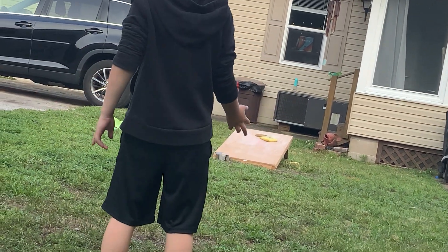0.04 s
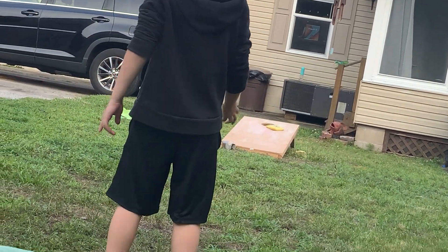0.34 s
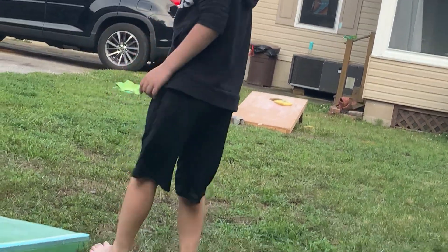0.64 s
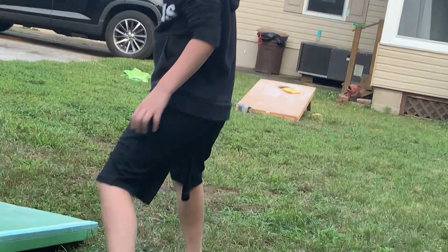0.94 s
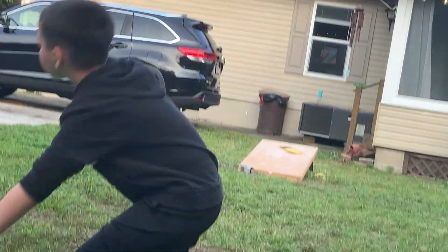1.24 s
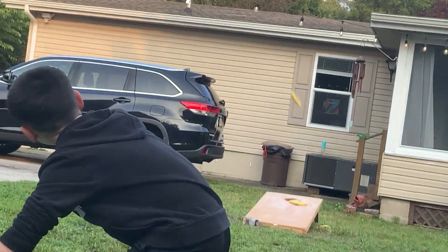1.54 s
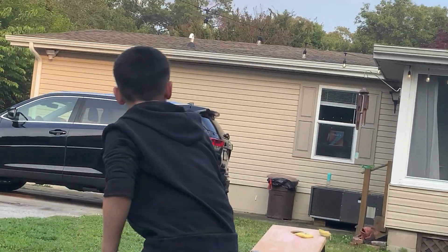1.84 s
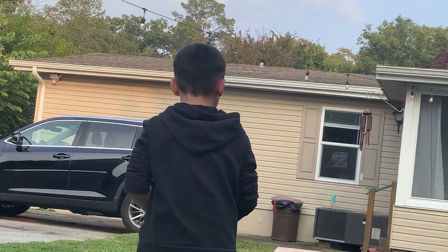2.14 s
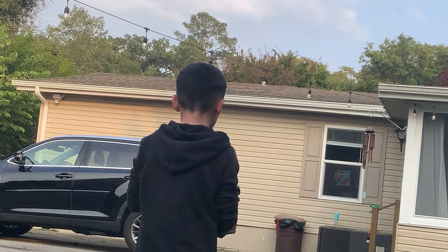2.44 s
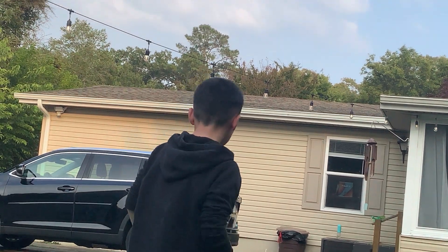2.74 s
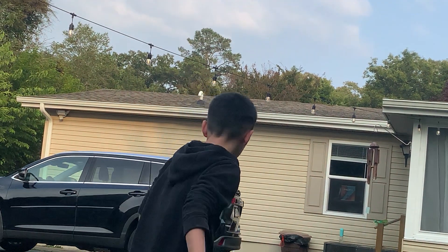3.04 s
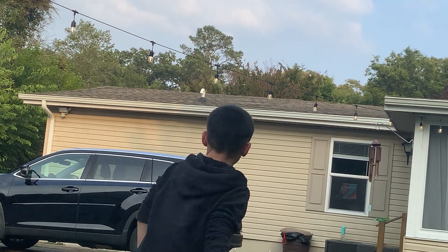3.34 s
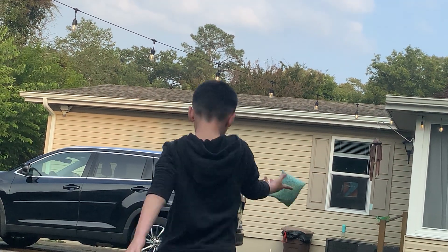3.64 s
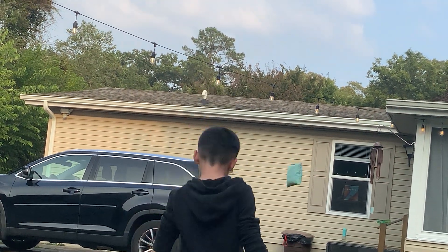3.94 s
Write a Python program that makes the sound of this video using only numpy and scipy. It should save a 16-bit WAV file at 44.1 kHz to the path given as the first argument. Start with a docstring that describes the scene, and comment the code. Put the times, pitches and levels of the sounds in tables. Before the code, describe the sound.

In an open yard, a light knock comes first, then a bean bag thumps onto a nearby wooden board, its filling crunching briefly. Faint footsteps and clothing rustle continue over a low rumble and distant insects.

```python
"""A bean bag lands on a hollow wooden board close to the microphone: the cloth slaps, the board booms
in its modes, the filling crunches and slides. A lighter knock comes earlier, and clothes swish and
grass rustles as a player moves on the lawn. The place is an open yard, with a low rumble, soft air and
faint insects farther off; walls and trees scatter the hits back. Two closely spaced microphone ports
pick it all up, each with its own phase and level."""
import sys
import numpy as np
from scipy import signal
from scipy.fft import rfft, irfft
from scipy.io import wavfile

SR = 44100
rng = np.random.default_rng(int(sys.argv[2]) if len(sys.argv) > 2 else 0)


def unload_audio(sound):
    """Save the sound as a 16-bit wav file, at the path given as the first command line argument."""
    columns = np.transpose(np.atleast_2d(sound))
    # keep every value between -1 and 1, then stretch to whole-number steps
    steps = np.round(np.clip(columns, -1, 1) * 32767)
    wavfile.write(sys.argv[1], SR, steps.astype(np.int16))


N = 176400

# The yard's low rumble and open air. Each row: frequency in Hz, level in dB.
RUMBLE_SPECTRUM = [(20, -17), (35, -26), (45, -18), (54, -6), (66, -3), (85, 0), (115, -7), (200, -19.5),
                   (320, -23), (550, -40), (1500, -58)]
AIR_SPECTRUM = [(150, 3), (400, -3.5), (600, -3), (1050, 3.5), (1500, -4.5), (2000, -8.5), (2500, -15),
                (3100, -11.5), (4300, -11.5), (5600, -17.5), (7200, -22.5), (9000, -20), (12500, -16)]
# How the rumble rises and falls. Each row: time in seconds, level in dB.
RUMBLE_LEVELS = [(0, -46), (.95, -44.5), (1.6, -46), (2.2, -46), (3.0, -47), (4, -48)]
# Single insects, faint at the microphone. Each row: pitch in Hz, level in dB.
INSECT_TRILLS = [(4398, -73), (4560, -79), (4703, -71.5), (5035, -79), (5437, -77.5)]
# The far insect chorus. Each row: band centre in Hz, half width in Hz, level in dB.
CHORUS_BANDS = [(4780, 340, -74.5), (8800, 660, -73)]

# The fine high swish of clothes. Each row: frequency in Hz, level in dB.
CLOTH_SWISH_SPECTRUM = [(3000, -31), (6000, -10.5), (7500, -8), (9000, 3.5), (10500, -8.5), (12300, 1),
                        (13400, -2)]
# The swish swells and fades as the player moves. Each row: time in seconds, level in dB.
CLOTH_SWISH_LEVELS = [(0, -62), (.35, -61.5), (.55, -68), (.7, -59), (.98, -65), (1.35, -59), (1.72, -67),
                      (2.1, -58.5), (2.4, -68.5), (2.62, -68), (2.8, -57), (3.0, -71), (3.2, -68),
                      (3.43, -55.5), (3.6, -60), (3.85, -70)]
# Footfalls on the lawn, and rustles of clothes and grass.
# Each row: peak time in seconds, level in dB, rise and fall in seconds.
FOOTFALLS = [(.91, -54.5, 0.037, 0.044), (1.39, -53.5, 0.048, 0.1), (2.24, -51.5, 0.048, 0.081),
             (3.34, -55, 0.051, 0.048)]
RUSTLE_SWELLS = [(1.36, -53.5, 0.075, 0.08), (1.58, -58.5, 0.074, 0.037), (2.11, -53.5, .05, 0.055),
                 (2.805, -59, .015, .02), (3.275, -57.5, .008, 0.027), (3.45, -52.5, 0.04, .045),
                 (3.98, -49.5, .018, 0.034)]
# The tone of a footfall, a rustle and a shoe scuff. Each row: frequency in Hz, level in dB.
STEP_SPECTRUM = [(50, 0), (130, 1), (300, 0), (700, -4), (1500, -12), (4000, -48)]
RUSTLE_SPECTRUM = [(200, 3), (700, 8), (1800, 7), (3000, 0), (6000, -1.5), (9000, -3), (11000, -0.5),
                   (15000, -25)]
SCUFF_SPECTRUM = [(350, -8), (650, 11), (1800, 8.5), (3200, 0.5), (9500, -1.5), (14000, -10)]
# Small snaps in the grass. Each row: peak time in seconds, level in dB, centre in Hz, fall in seconds.
GRASS_SNAPS = [(1.033, -52, 5900, 0.0078), (1.316, -50, 6300, .003), (1.383, -43, 1900, .004),
               (2.307, -52.5, 6500, .003), (2.52, -55.5, 7500, .004)]

# Modes of the lighter knock and of the hollow board.
# Each row: frequency in Hz, level in dB, seconds to fall by 60 dB.
KNOCK_MODES = [(88, -38, 0.16), (176, -38, 0.13), (295, -38, 0.085), (532, -41.5, 0.076),
               (670, -38.5, 0.065), (890, -34.5, 0.064), (1110, -37.5, 0.041), (1880, -44, 0.038)]
BOARD_MODES = [(57, -26.5, 0.21), (84.5, -21.5, 0.11), (145, -24.5, 0.12), (171.5, -26.5, .13),
               (235.4, -31.5, 0.17), (279.1, -30.5, 0.24), (318, -26.5, 0.15), (413, -26.5, 0.1),
               (465, -21, 0.054), (511, -28, 0.12), (695, -29, 0.095), (884, -32.5, 0.1), (967, -31, .05),
               (1912, -36, 0.087)]
# Dull thumps: the bag's full weight arrives, then the board rocks back.
# Each row: start in seconds, gain in dB, low-pass cutoff in Hz.
BOARD_THUMPS = [(1.8445, -2, 135), (1.8795, -8, 240)]
# The cloth's slap and the filling's crunch from close by. Each row: frequency in Hz, level in dB.
SLAP_SPECTRUM = [(300, -14), (1200, -6), (2500, 4.5), (4500, 3.5), (6500, 5.5), (8500, -1), (11000, -13),
                 (13000, -7)]
FILLING_SPECTRUM = [(200, 1), (500, 4.5), (1000, 1), (1400, 0.5), (2100, 4.5), (3300, -0.5), (5000, -4.5),
                    (7000, -7), (9000, -12), (11000, -19), (13000, -22)]
# The filling surges as the bag lands, flattens and slides.
# Each row: peak time in seconds, level in dB, rise and fall in seconds.
FILLING_SURGES = [(1.8369, -25.5, 0.0017, 0.0043), (1.859, -36, 0.011, 0.024), (1.935, -47, 0.018, 0.054)]

# What walls and trees send back to the microphone. Each row: frequency in Hz, level in dB.
SCATTER_SPECTRUM = [(60, -6), (250, -7), (1500, 2), (5000, -5), (12000, -0.5)]
# Phase between the ports. Each row: frequency in Hz, lead of the left port in radians.
LEFT_PORT_LEAD = [(30, 0), (340, .1), (690, -.7), (1250, .3), (1650, 1.6), (2050, 1.5), (2510, 3.14),
                  (3000, 5.0), (3500, 6.1), (4500, 6.3), (4900, 6.95), (6500, 6.95), (9400, 7.7),
                  (12100, 8.8), (13200, 9.4)]
# Balance between the ports. Each row: frequency in Hz, left minus right in dB.
LEFT_PORT_EXCESS = [(30, -0.5), (350, 1), (700, -7), (1100, -3.5), (1700, -1.5), (3000, 0), (15000, 0)]
# The share of diffuse sound that differs between the ports. Each row: frequency in Hz, gain in dB.
DIFFUSE_SHARE = [(50, -29.5), (150, -11.5), (400, -3.5), (900, -5.5), (1600, -18), (2400, -52), (4200, -18),
                 (6000, -7), (9000, -11), (13000, -26)]

SOFT_BUILD_CYCLES, FIRM_BUILD_CYCLES = 0.75, 0.33  # cycles a soft or firm contact needs to start a mode
RUSTLE_GRAINS_PER_S, RUSTLE_SCATTER_DB = 1600, 3


def amp(db):
    """Decibels to gain."""
    return 10 ** (np.asarray(db) / 20)


def unit(x):
    """Scale to rms 1."""
    return x / np.sqrt(np.mean(x ** 2))


def times():
    """The time of each sample in seconds."""
    return np.arange(N) / SR


def freqs():
    """The frequency of each spectral bin, at least 1 Hz."""
    return np.maximum(np.arange(N // 2 + 1) * SR / N, 1)


def follow(points):
    """Read (seconds, value) points over time."""
    return np.interp(times(), *np.array(points).T)


def curve(points):
    """Read (Hz, value) points on a log-frequency axis."""
    hz, value = np.array(points).T
    return np.interp(np.log(freqs()), np.log(hz), value)


def colour(x, spectrum):
    """Filter by (Hz, dB) points."""
    return irfft(rfft(x) * amp(curve(spectrum)), N)


def soften(x, cutoff_hz):
    """A gentle low-pass, as from a softer contact."""
    return signal.sosfilt(signal.butter(3, cutoff_hz, fs=SR, output="sos"), x)


def band_noise(gains):
    """Noise of rms 1, shaped by one gain for each spectral bin."""
    return unit(irfft(rfft(rng.standard_normal(N)) * gains, N))


def noise(spectrum):
    """Noise of rms 1, shaped by (Hz, dB) points."""
    return band_noise(amp(curve(spectrum)))


def waver(hz):
    """A random wander of rms 1, mostly slower than hz."""
    return band_noise(np.exp(-(freqs() / hz) ** 2))


def drifting_tone(hz, drift_hz, rate_hz):
    """A sine whose pitch wanders around hz."""
    pitch = hz + drift_hz * waver(rate_hz)
    return np.sin(2 * np.pi * np.cumsum(pitch) / SR)


def swell(peak_s, rise_s, fall_s):
    """An exponential rise to 1 and an exponential fall."""
    t = times() - peak_s
    return np.exp(np.where(t < 0, t / rise_s, -t / fall_s))


def swells(rows):
    """One envelope from several swells, each at its own level."""
    return sum(amp(db) * swell(at, rise, fall) for at, db, rise, fall in rows)


def grains(spectrum, per_s, scatter_db):
    """Dense tiny collisions of uneven size, coloured and scaled to rms 1."""
    clicks = (rng.random(N) < per_s / SR) * rng.choice([-1, 1], N)
    sizes = amp(scatter_db * np.minimum(rng.exponential(size=N), 4))
    return unit(colour(clicks * sizes, spectrum))


def ring(start_s, modes, build_cycles):
    """Damped modes of a struck body; the low ones build up last."""
    t = np.maximum(times() - start_s, 0)
    out = 0
    for hz, db, t60 in modes:
        build = 1 - np.exp(-(hz * t / build_cycles) ** 2)
        decay = np.exp(-np.log(1000) * t / t60)
        out += amp(db) * np.sin(2 * np.pi * hz * t) * decay * build
    return out


def background():
    """The bed of the yard: low rumble, a wavering hum and the soft hiss of the open air."""
    rumble = amp(follow(RUMBLE_LEVELS) + 0.95 * waver(hz=7)) * noise(RUMBLE_SPECTRUM)
    hum = amp(-52 + 3 * waver(hz=6.3)) * unit(drifting_tone(hz=54.5, drift_hz=3.1, rate_hz=7.75))
    air = amp(-54 + 0.5 * waver(hz=3.9)) * noise(AIR_SPECTRUM)
    return rumble + hum + air


def insects():
    """A few steady, fluttering trills over a far chorus that swells slowly."""
    out = 0
    for hz, db in INSECT_TRILLS:
        tone = drifting_tone(hz, drift_hz=9, rate_hz=29.1)
        level = amp(db + 1.2 * waver(hz=0.77))
        flutter = amp(1.5 * waver(hz=45))
        out += level * unit(tone * flutter)
    for hz, width, db in CHORUS_BANDS:
        band = np.exp(-.5 * ((freqs() - hz) / width) ** 2)
        out += amp(db + 2.5 * waver(hz=1.8)) * band_noise(band)
    return out


def yard_scatter(hits):
    """House walls and trees return a thin, late tail to the microphone."""
    delay_s, t60_s, return_db = 0.03, 0.45, -13
    tail = noise(SCATTER_SPECTRUM) * swell(delay_s, delay_s / 4, t60_s / np.log(1000))
    tail /= np.sqrt(np.sum(tail ** 2))
    return amp(return_db) * signal.fftconvolve(hits, tail)[:N]


def cloth_swish():
    """Clothes give a fine high swish, swelling and fading as the player moves."""
    return amp(follow(CLOTH_SWISH_LEVELS)) * noise(CLOTH_SWISH_SPECTRUM)


def steps():
    """Feet press dully into the lawn."""
    return swells(FOOTFALLS) * noise(STEP_SPECTRUM)


def rustles():
    """Cloth and grass brush in tiny grains as the player moves, with a few small snaps."""
    out = swells(RUSTLE_SWELLS) * grains(RUSTLE_SPECTRUM, RUSTLE_GRAINS_PER_S, RUSTLE_SCATTER_DB)
    snap_rise_s, snap_octaves = 0.00092, 0.53
    for at, db, hz, fall in GRASS_SNAPS:
        band = np.exp(-.5 * (np.log2(freqs() / hz) / snap_octaves) ** 2)
        out += amp(db) * swell(at, snap_rise_s, fall) * band_noise(band)
    return out


def scuff():
    """A sole drags briefly over the lawn, with more midrange than the rustles."""
    drag = amp(-43.5) * swell(peak_s=.874, rise_s=.028, fall_s=.014)
    return drag * grains(SCUFF_SPECTRUM, RUSTLE_GRAINS_PER_S, RUSTLE_SCATTER_DB)


def slap(at):
    """The bright crack of a first contact: one sharp pressure pulse."""
    delay = np.exp(-2j * np.pi * freqs() * at)
    return irfft(amp(curve(SLAP_SPECTRUM)) * delay, N)


def knock(start_s):
    """A light contact gives a duller tick and a short hollow ring."""
    tick = amp(-15) * soften(slap(start_s), cutoff_hz=4870)
    return tick + ring(start_s, KNOCK_MODES, FIRM_BUILD_CYCLES)


def bean_bag():
    """Close to the microphone the cloth slaps, the board booms and rocks, and the beans collide."""
    lands_s = 1.8369
    cloth = amp(-5) * slap(lands_s)
    boom = ring(lands_s, BOARD_MODES, SOFT_BUILD_CYCLES)
    thumps = sum(amp(db) * soften(ring(at, BOARD_MODES, FIRM_BUILD_CYCLES), cutoff_hz)
                 for at, db, cutoff_hz in BOARD_THUMPS)
    filling = swells(FILLING_SURGES) * grains(FILLING_SPECTRUM, per_s=5000, scatter_db=2.5)
    return cloth + boom + thumps + filling


def microphone_ports(common, diffuse):
    """Two closely spaced ports differ in phase and level, and take the diffuse part in opposite sign."""
    half_db = curve(LEFT_PORT_EXCESS) / 2
    lag = np.exp(-1j * curve(LEFT_PORT_LEAD))
    left = rfft(common + diffuse) * amp(half_db)
    right = rfft(common - diffuse) * amp(-half_db) * lag
    return irfft(np.array([left, right]), N)


def scene():
    """From beside the board: the hits and the moving player over the steady sounds of the yard."""
    hits = bean_bag() + knock(start_s=.6522)
    common = hits + yard_scatter(hits) + rustles() + scuff() + steps()
    common += insects() + background() + cloth_swish()
    diffuse = colour(background() + cloth_swish() + yard_scatter(hits), DIFFUSE_SHARE)
    return microphone_ports(common, diffuse)


def record(dry):
    """The microphones lose the deepest bass, and the recorder cuts the top."""
    low_cut_hz, top_hz = 39, 13200
    lean = irfft(rfft(dry) / np.sqrt(1 + (low_cut_hz / freqs()) ** 10), N)
    return signal.sosfilt(signal.ellip(8, .2, 70, top_hz, fs=SR, output="sos"), lean)


dry = scene()
out = record(dry)
unload_audio(out)
```